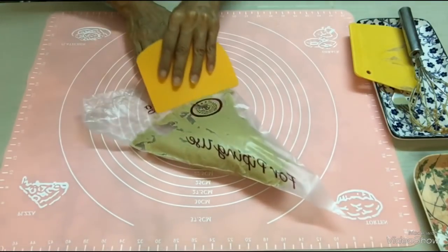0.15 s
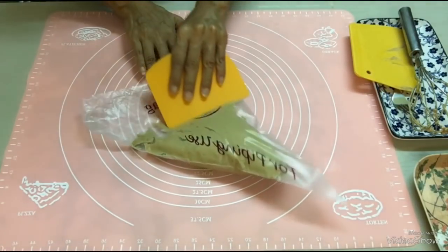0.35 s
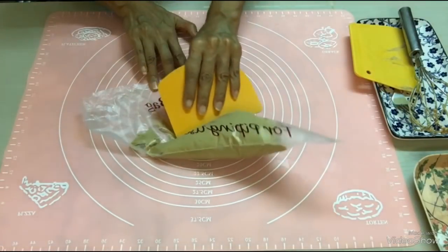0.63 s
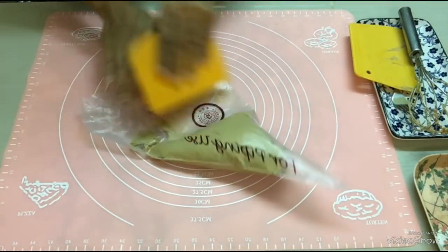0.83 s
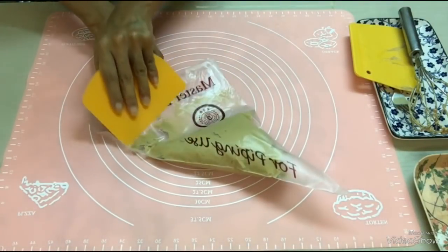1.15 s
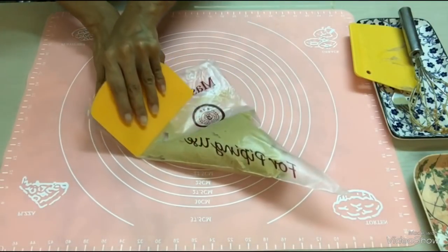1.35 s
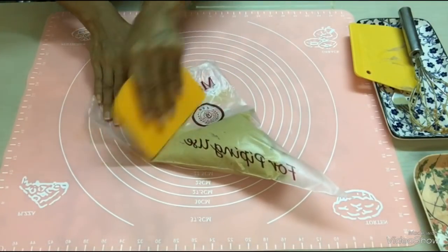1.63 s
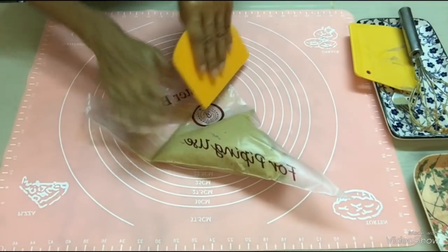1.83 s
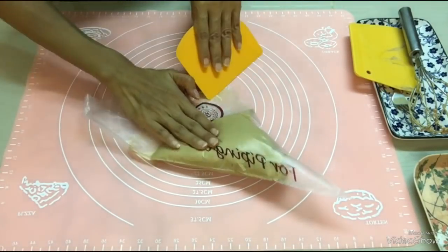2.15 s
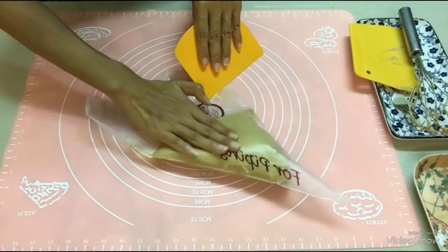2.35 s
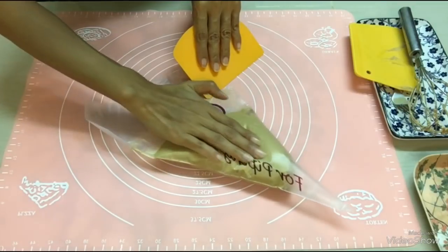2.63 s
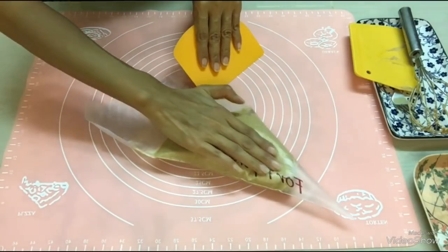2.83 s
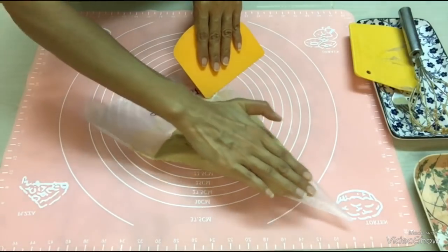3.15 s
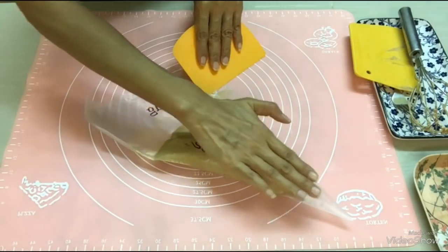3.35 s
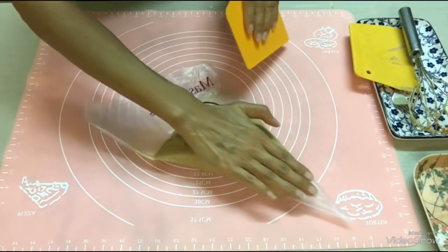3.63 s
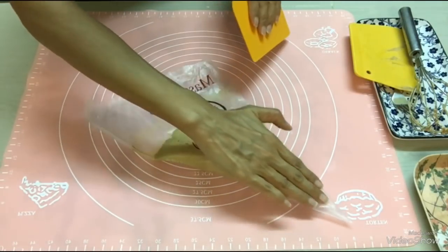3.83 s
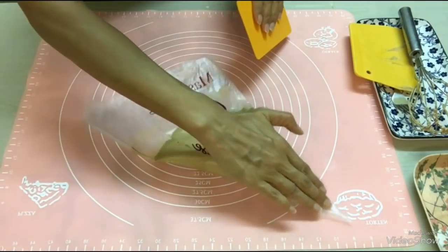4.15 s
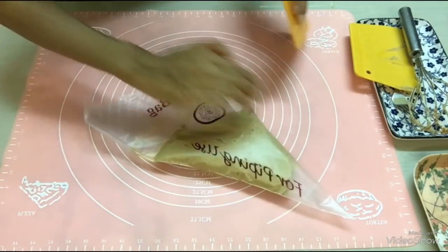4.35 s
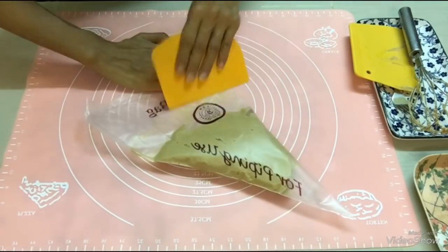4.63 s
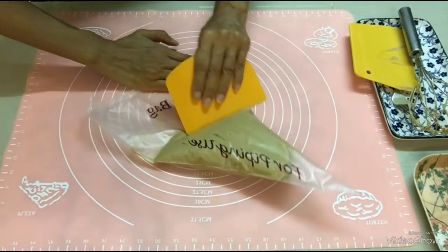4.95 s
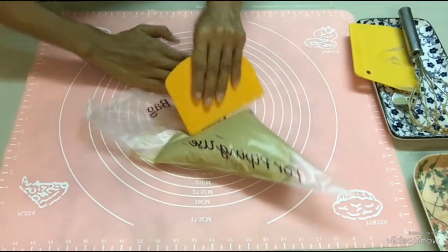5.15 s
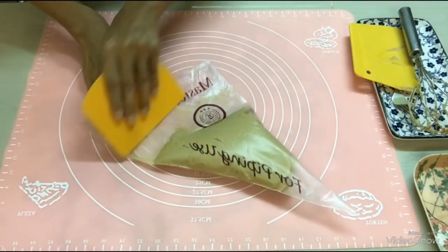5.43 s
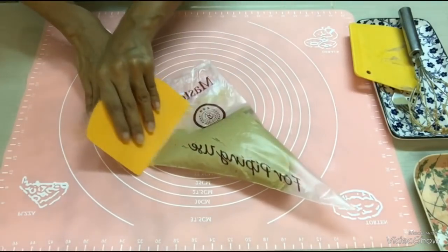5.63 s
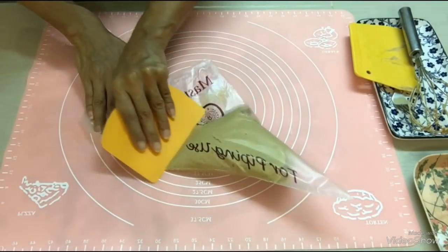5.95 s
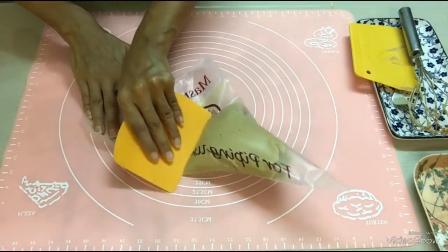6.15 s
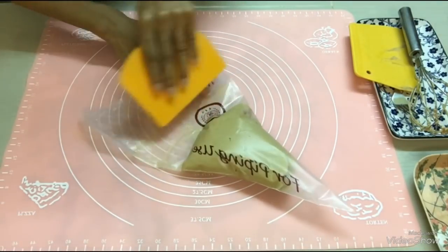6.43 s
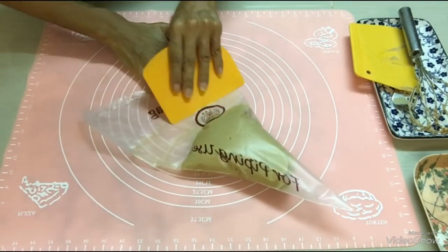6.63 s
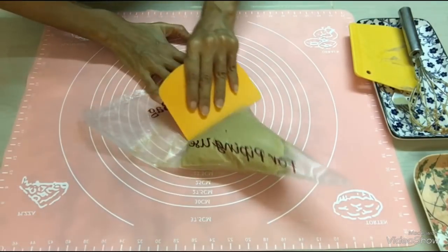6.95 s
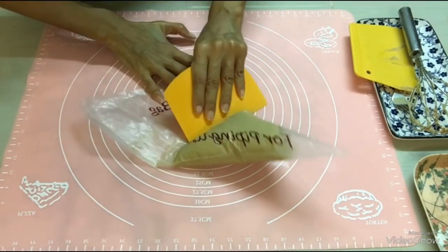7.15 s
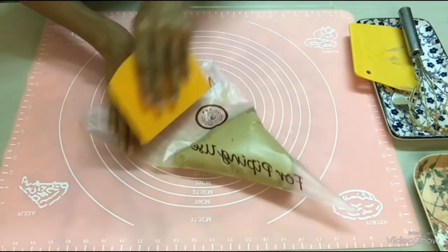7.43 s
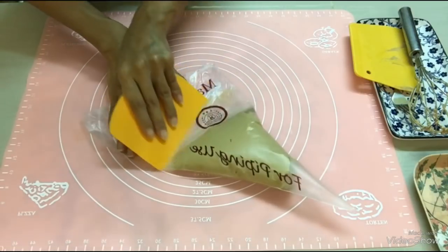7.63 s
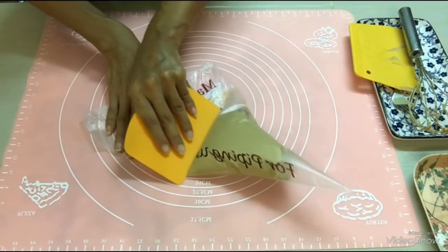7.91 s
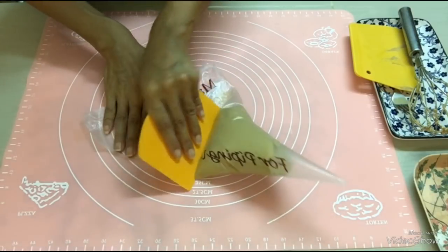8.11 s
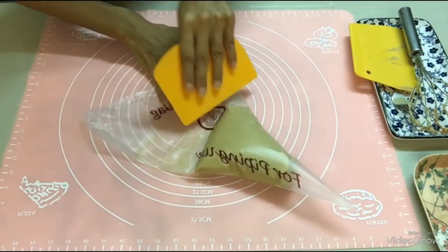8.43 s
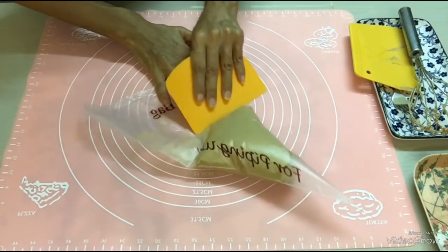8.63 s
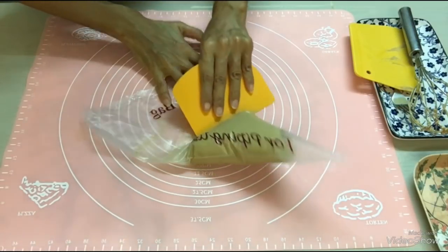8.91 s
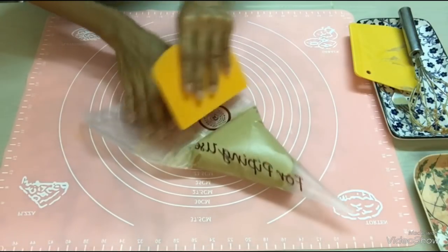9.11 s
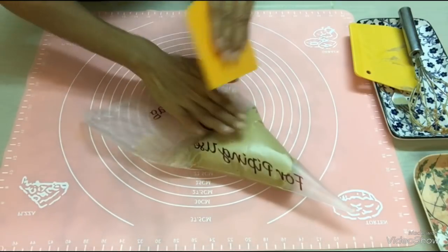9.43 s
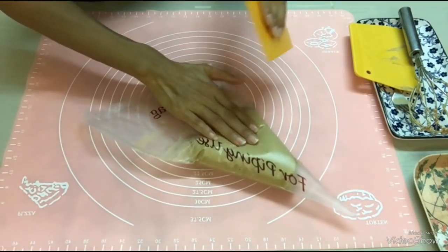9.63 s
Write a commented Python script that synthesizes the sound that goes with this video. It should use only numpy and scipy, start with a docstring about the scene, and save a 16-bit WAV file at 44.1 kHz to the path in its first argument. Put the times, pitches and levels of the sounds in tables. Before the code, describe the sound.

A filled plastic bag crinkles and snaps sharply as it is scraped and pressed on a mat in a quiet, hard-surfaced kitchen.

```python
"""Piping bag worked on a kitchen mat

A filled plastic bag is scraped and patted: its film buckles in sharp snaps (dying bursts of tiny cracks,
coloured by the film and one broad ring) over a clumpy crackle of small creases, with dull pats (damped sines).
The hard kitchen rings on (sparse random taps). Shaped noise gives a low rumble, a wavering hum and a soft hiss;
gliding sines give faint far tones.
"""
import sys
import numpy as np
from scipy import signal
from scipy.fft import rfft, irfft
from scipy.io import wavfile

SR = 44100
rng = np.random.default_rng(int(sys.argv[2]) if len(sys.argv) > 2 else 0)


def wav_out(sig):
    """Save sig, one row per channel (or a flat mono array), as 16-bit PCM at SR to the path in sys.argv[1]."""
    wavfile.write(sys.argv[1], SR, np.round(np.clip(np.atleast_2d(sig).T, -1, 1) * 32767).astype(np.int16))


N = 431298


def gain_of(db):
    """Decibels to amplitude gain."""
    return 10 ** (np.asarray(db) / 20)


def evened(x):
    """Scales to rms 1."""
    return x / np.sqrt(np.mean(x ** 2) + 1e-20)


def read_spectrum(points, hz):
    """Interpolates on a log-frequency axis."""
    point_hz, value = np.transpose(points)
    return np.interp(np.log(hz + 1), np.log(point_hz + 1), value)


def along(rows):
    """Interpolates a (time_s, value) curve at every sample."""
    return np.interp(np.arange(N) / SR, *np.transpose(rows))


def drift(cutoff_hz):
    """Low-passed noise of rms 1, computed at a slow rate."""
    rate_hz = 400
    steps = rng.standard_normal(round(N / SR * rate_hz) + 2)
    lowpass = signal.butter(2, cutoff_hz, fs=rate_hz, output="sos")
    steps = signal.sosfiltfilt(lowpass, steps)
    return evened(np.interp(np.arange(N) / SR * rate_hz, np.arange(len(steps)), steps))


def air(rms_db=-60):
    """Steady room noise: white noise shaped to a falling spectrum."""
    # room noise spectrum, with a band-limit drop near 16 kHz: hz, relative_db_per_hz
    air_spectrum = [(25, -17), (87, -7.5), (187, -13.5), (259, -19), (1200, -28.5), (3700, -32.5),
                    (9000, -44), (15300, -48.5), (16000, -92)]
    hz = np.fft.rfftfreq(N, 1 / SR)
    shaped = rfft(rng.standard_normal(N)) * gain_of(read_spectrum(air_spectrum, hz))
    return gain_of(rms_db) * evened(irfft(shaped, N))


def wavering(level_curve, centre_hz, width_hz):
    """Noise in one narrow resonance, so its level and phase waver."""
    hz = np.fft.rfftfreq(N, 1 / SR)
    resonance = 1 / (1 + (2 * (hz - centre_hz) / width_hz) ** 2)
    band = irfft(rfft(rng.standard_normal(N)) * resonance, N)
    return gain_of(along(level_curve)) * evened(band)


def rumble():
    """Deep narrow-band noise that swells and sinks."""
    # rumble level: time_s, level_db
    rumble_level = [(1.3, -57), (2.5, -69.5), (4.8, -70.5), (5.3, -58), (5.6, -65.5), (8.4, -73),
                    (8.8, -58.5), (9.78, -63)]
    return wavering(rumble_level, centre_hz=58.6, width_hz=5.2)


def hum():
    """Low wavering hum from a wider noise resonance."""
    # hum level: time_s, level_db
    hum_level = [(0, -68), (4.3, -64.5), (6.5, -57), (8.3, -58), (8.7, -64)]
    return wavering(hum_level, centre_hz=135.8, width_hz=36.0)


def tones():
    """Faint far sines that glide, with unsteady pitch and level."""
    # far tones: start_s, end_s, start_hz, end_hz, level_db
    far_tones = [(0.8, 0.945, 610, 600, -64), (9.042, 9.402, 355, 425, -69)]
    out, waver, fade = np.zeros(N), drift(25.), drift(15.0)
    for start_s, end_s, from_hz, to_hz, level_db in far_tones:
        at, size = round(start_s * SR), round((end_s - start_s) * SR)
        span = slice(at, at + size)
        pitch_hz = np.linspace(from_hz, to_hz, size) * (1 + 0.004 * waver[span])
        sine = np.sqrt(2) * np.sin(2 * np.pi * np.cumsum(pitch_hz) / SR)
        out[span] += gain_of(level_db + 0.87 * fade[span]) * sine * signal.windows.tukey(size, .4)
    return out


def kitchen(x, worktop_db=6, worktop_t60_s=0.039, turn_hz=7.3):
    """Sparse taps of random sign: quick worktop echoes, then the room, each band dying at its own speed."""
    # room decay: hz, t60_s
    room_decay = [(400, 0.41), (1500, 0.44), (4000, 0.45), (9000, 0.42), (15000, 0.32)]
    out, turn = np.zeros(N), np.arange(N) / SR * 2 * np.pi * turn_hz
    for k in range(3):  # three tails share the moments, so that like snaps do not echo alike
        taps = np.zeros(SR)
        at = np.arange(80, SR - 20, 20)
        taps[at + rng.integers(0, 20, len(at))] = rng.choice([-1., 1.], len(at))
        hz, t, z = signal.stft(taps, SR, nperseg=256)
        decay = gain_of(-60 * t / read_spectrum(room_decay, hz)[:, None])
        tail = signal.istft(z * decay, SR, nperseg=256)[1]
        # the worktop part dies on top of the room decay
        worktop = gain_of(worktop_db - 60 * np.arange(len(tail)) / SR / worktop_t60_s)
        tail = tail * (1 + worktop) / np.linalg.norm(tail)
        share = np.sqrt(2 / 3) * np.cos(turn + k * np.pi / 3)  # squares sum to 1
        out += signal.fftconvolve(x * share, tail)[:N]
    return out


def pats(mat_hz=300.0, t60_s=0.0061, rise_s=0.003):
    """Scraper or hand meets the mat: a soft, heavily damped low sine."""
    # blows: time_s, peak_db
    pat_rows = [(0.623, -35.5), (1.971, -44.5), (2.587, -39)]
    t, out = np.arange(3000) / SR, np.zeros(N)
    blow = gain_of(-60 * t / t60_s) * np.sin(2 * np.pi * mat_hz * t) * np.minimum(t / rise_s, 1)
    for time_s, peak_db in pat_rows:
        out[round(time_s * SR):][:len(t)] += gain_of(peak_db) * blow / abs(blow).max()
    return out


def buckles(ring_hz, tilt_db, chance, burst_s=0.0014, tick_s=0.0009, ring_db=7.5, ring_octaves=0.74, tearing=0.58):
    """One sound a row, peak 1: a dying burst of tiny cracks through the film's colour and one broad ring."""
    # film colour, with a band-limit drop near 16 kHz: hz, relative_db_per_hz
    film_spectrum = [(180, -24.5), (300, -20.5), (730, -12), (1150, -7), (1770, -4.5), (3030, -7),
                     (7130, -8.5), (10500, -15.5), (15300, -16.5), (16000, -71)]
    evening = .35  # share of the noise burst's spectral raggedness removed, for a smoother colour
    hz, t = abs(np.fft.fftfreq(1024, 1 / SR)) + 1, np.arange(chance.shape[1]) / SR
    ring = ring_db * np.exp(-(np.log2(hz / ring_hz[:, None]) / ring_octaves) ** 2)
    tilt = tilt_db[:, None] * np.log2(hz / 3000).clip(-1.5, 2)
    log_gain = (read_spectrum(film_spectrum, hz) + ring + tilt) * np.log(10) / 20
    colour = np.exp(log_gain - 1j * signal.hilbert(log_gain).imag)  # minimum phase: nothing before the crack

    rise, treble = np.minimum(t / 0.0014 + 0.34, 1), 1 / (1 + (1420.0 / hz) ** 4)
    lasting = np.exp(tearing * chance[:, -1:])  # some creases flip at once, others tear along

    def burst(decay_s):
        """Spectrum of a dying burst of random cracks."""
        return np.fft.fft(chance * rise * np.exp(-t / decay_s / lasting) / np.sqrt(decay_s), n=1024)

    cracks = (1 - treble) * burst(burst_s) + treble * burst(tick_s)  # the treble is over first
    cracks = cracks / abs(cracks) ** evening
    sound = np.fft.ifft(colour * cracks).real * signal.windows.tukey(2048, .5)[1024:]
    return sound / abs(sound).max(axis=1, keepdims=True)


def rustling(build_db_per_s=1200., settle_db_per_s=236.5):
    """Crackle gain and crease centre_hz: bursts build, hold and settle; the louder one sets the centre."""
    # bursts as scraper or hand works the bag: start_s, hold_s, level_db, centre_hz
    bursts = [(0.0, 0.054, -51.5, 2000), (0.056, 0.067, -38.5, 2650), (0.216, 0.16, -46.5, 2080),
              (0.368, 0.079, -37, 1740), (0.58, 0.013, -35, 3700), (0.702, 0.19, -54, 2670),
              (0.963, 0.15, -45.5, 3100), (1.133, 0.25, -41, 3400), (1.42, 0.13, -44, 2120),
              (1.674, 0.033, -44, 2700), (2.074, 0.1, -49, 3140), (2.351, 0.07, -48, 3220),
              (2.562, 0.089, -44.5, 2600), (2.832, 0.093, -40, 2300), (2.979, 0.07, -44, 2720),
              (3.156, 0.076, -45.5, 2680), (3.346, 0.07, -51, 2640), (3.692, 0.035, -50.5, 2950),
              (3.865, 0.14, -48, 3320), (4.01, 0.067, -51, 2820), (4.116, 0.08, -43.5, 1860),
              (4.25, 0.032, -39, 2120), (4.647, 0.012, -35, 3300), (4.737, 0.016, -38, 2710),
              (4.829, 0.027, -43, 3180), (4.892, 0.05, -30, 3010), (4.978, 0.091, -42, 2220),
              (5.204, 0.14, -44, 3100), (5.433, 0.044, -39, 4270), (5.536, 0.034, -33.5, 3830),
              (5.687, 0.12, -39, 2960), (5.932, 0.22, -38.5, 2900), (6.265, 0.11, -46, 3540),
              (6.458, 0.16, -50, 3240), (6.659, 0.18, -42, 3130), (6.831, 0.064, -36.5, 3620),
              (7.01, 0.039, -39, 3020), (7.078, 0.032, -36, 3020), (7.324, 0.15, -47, 2700),
              (7.551, 0.018, -37.5, 2770), (7.626, 0.23, -37.5, 2900), (7.902, 0.19, -40, 2810),
              (8.251, 0.089, -41.5, 3750), (8.465, 0.011, -39, 3100), (8.574, 0.095, -39, 3080),
              (8.707, 0.22, -40, 3140), (8.878, 0.015, -31, 3460), (9.058, 0.08, -45.5, 2880),
              (9.245, 0.015, -43.5, 3220), (9.632, 0.1, -43, 3020)]
    start_s, hold_s, level_db, centre_hz = np.transpose(bursts)[:, :, None]
    t = np.arange(0, N / SR + .004, .002)
    build_db = build_db_per_s * (start_s - t).clip(0)
    settle_db = settle_db_per_s * (t - start_s - hold_s).clip(0)
    power = gain_of(level_db - build_db - settle_db) ** 2
    total, now = power.sum(0), np.arange(N) / SR
    return np.interp(now, t, np.sqrt(total)), np.interp(now, t, (power * centre_hz).sum(0) / total)


def crackle(count=32):
    """Small creases give way in clumps, most tiny and a few large; those near the worked centre speak most."""
    # rate at -45 dB; the crackle thins out and its grains grow as the level rises
    creases_per_s, density_per_db = 620., -0.06
    spread_db, clump_db = 6, 2
    ring_hz = np.geomspace(1000, 9000, count)
    tilt_db = 1.26 * np.log2(ring_hz / 5800.0) + 2.48 * rng.standard_normal(count)
    chance = rng.standard_normal((count, 512))
    sounds = buckles(ring_hz, tilt_db, chance, burst_s=0.001, tick_s=0.0006,
                     ring_db=10.0, ring_octaves=0.35, tearing=0.19)

    level, centre_hz = rustling()
    density = np.exp(density_per_db * (20 * np.log10(level + 1e-5) + 45))
    size = gain_of(spread_db * np.minimum(rng.exponential(1, N), 2.5))
    fires = rng.random(N) < density * creases_per_s / SR
    size = size * fires / np.sqrt(density)
    size = size * gain_of(clump_db * np.tanh(drift(15.2))) * rng.choice([-1., 1.], N)
    crease = rng.integers(0, count, N)
    size = size * gain_of(-10.5 * np.log2(ring_hz[crease] / centre_hz) ** 2)
    out = sum(signal.oaconvolve(size * (crease == k), sounds[k])[:N] for k in range(count))
    return level * evened(out)


def snaps(count=4):
    """Loud buckles, each with weaker neighbours giving way around it; higher rings sound brighter."""
    # loud buckles of the film: time_s, peak_db, ring_hz
    snap_rows = [(0.053, -29, 3000), (0.073, -18.5, 3820), (0.151, -23, 4300), (0.293, -30, 6460),
                 (0.386, -18.5, 1670), (0.396, -19, 2200), (0.437, -18, 2800), (0.515, -20.5, 1870),
                 (0.444, -17.5, 2200), (0.605, -25, 3360), (0.624, -26, 1500), (0.713, -38, 5000),
                 (0.894, -27.5, 2580), (1.152, -22, 2700), (1.161, -20, 6600), (1.331, -18, 8350),
                 (1.638, -29, 3900), (1.708, -21.5, 4250), (1.765, -27, 4970), (1.778, -17, 4670),
                 (2.183, -20, 2630), (2.191, -19.5, 3780), (2.312, -28.5, 1960), (2.356, -25, 4000),
                 (2.403, -22.5, 3670), (2.496, -20, 2500), (2.588, -21, 2450), (2.607, -18.5, 2050),
                 (2.683, -19, 2300), (2.8, -25.5, 1500), (2.833, -20, 1450), (2.857, -11.5, 3350),
                 (2.897, -14, 2570), (2.99, -8.5, 2920), (3.053, -19, 2360), (3.078, -18.5, 2070),
                 (3.109, -18.5, 2790), (3.132, -14, 2870), (3.187, -20.5, 2460), (3.214, -25.5, 1960),
                 (3.252, -24.5, 2020), (3.32, -14.5, 2960), (3.329, -13, 2320), (3.499, -30, 3500),
                 (3.634, -36, 2280), (3.702, -21.5, 2660), (3.732, -21.5, 1860), (3.765, -23.5, 2640),
                 (3.777, -19, 3120), (3.85, -28, 3400), (3.869, -27.5, 2240), (4.02, -17, 3550),
                 (4.052, -12.5, 4600), (4.064, -14.5, 3220), (4.102, -23, 1650), (4.15, -19.5, 1920),
                 (4.193, -20.5, 1860), (4.244, -19, 1920), (4.287, -11.5, 3260), (4.748, -17.5, 2640),
                 (4.854, -13, 3570), (4.914, -18, 2600), (4.944, -15, 2680), (5.001, -19, 2120),
                 (5.021, -17.5, 2180), (5.211, -26, 3250), (5.436, -16, 4660), (5.46, -16, 4550),
                 (5.552, -16.5, 2480), (5.578, -17, 3550), (5.938, -22, 2550), (5.979, -15.5, 2280),
                 (6.024, -26, 3630), (6.098, -22, 2950), (6.134, -11.5, 2720), (6.078, -21.5, 1970),
                 (6.505, -25.5, 3520), (6.567, -24, 3700), (6.72, -20, 2800), (6.874, -18.5, 4200),
                 (6.916, -15.5, 3640), (6.99, -13.5, 3570), (7.073, -9.5, 3030), (7.093, -8, 3220),
                 (7.126, -16.5, 4500), (7.241, -7.5, 2370), (7.427, -18.5, 3870), (7.53, -21, 4200),
                 (7.637, -12.5, 2440), (7.674, -25, 4200), (7.73, -15.5, 2580), (7.745, -22, 4350),
                 (7.793, -19, 5200), (7.808, -13, 2470), (7.906, -17.5, 2870), (7.993, -9, 3240),
                 (8.033, -13.5, 3520), (8.05, -13.5, 3600), (8.338, -21, 3150), (8.575, -14, 2440),
                 (8.704, -12, 3170), (8.769, -19.5, 2880), (8.804, -18, 4000), (8.921, -19.5, 3000),
                 (9.094, -21.5, 3030), (9.271, -19, 3400), (9.647, -20.5, 2380), (9.662, -20.5, 3780),
                 (9.726, -10, 3480)]
    after_s, after_db, after_octaves = .006, -12, 0.56
    time_s, peak_db, ring_hz = np.transpose(snap_rows)[:, :, None]
    late, weak, other = rng.random((len(time_s), count, 3)).transpose(2, 0, 1)
    order = np.arange(count)
    follows = order > 0  # the first is the listed buckle
    time_s = (time_s + follows * after_s * (late - .18) * order).ravel()
    peak_db = (peak_db + follows * after_db * (.5 + weak + order / count)).ravel()
    ring_hz = (ring_hz * 2 ** (follows * after_octaves * (2 * other - 1))).ravel()
    tilt_db = 3.66 * np.log2(ring_hz / 2820.0)
    sounds = buckles(ring_hz, tilt_db, rng.standard_normal((len(time_s), 512)))
    out = np.zeros(N + SR)
    for at, db, sound in zip(np.round(time_s * SR).astype(int), peak_db, sounds):
        out[at:at + 1024] += gain_of(db) * sound
    return out[:N]


def facing(x, body_hz=1380.0, treble_hz=6650.0):
    """Hands and scraper vary the film's treble; loose film has more body until it is pinned flat."""
    # treble level of the bag: time_s, gain_db
    treble_level = [(0, 5), (.6, -1.5), (1.3, 5.5), (1.7, -4), (2.5, 0.5), (3, -7), (3.9, -7), (4.2, -0.5),
                    (4.9, -7.5), (5.5, -2), (6.7, -6), (9.2, -8.5), (9.78, -7.5)]
    loose_db, pinned_db, pinned_from_s = 0, -4.5, 4.1

    def below(hz):
        """Zero-phase low-pass."""
        return signal.sosfiltfilt(signal.butter(2, hz, fs=SR, output="sos"), x)

    body, dull = below(body_hz), below(treble_hz)
    body_db = np.where(np.arange(N) / SR < pinned_from_s, loose_db, pinned_db)
    middle, treble = dull - body, x - dull
    return gain_of(body_db) * body + middle + gain_of(along(treble_level)) * treble


def scene():
    """The background, the bag and its echo in the kitchen."""
    background = air() + hum() + rumble() + tones()
    bag = facing(snaps() + crackle()) + pats()
    return (background + bag + gain_of(-7.0) * kitchen(bag))[None]


def record(dry, edge_hz=16800):
    """Band limit: a steep linear-phase low-pass."""
    lowpass = signal.firwin(511, edge_hz, window=("kaiser", 9), fs=SR)
    return signal.oaconvolve(dry, lowpass[None], "same")


dry = scene()
out = record(dry)
wav_out(out)
```